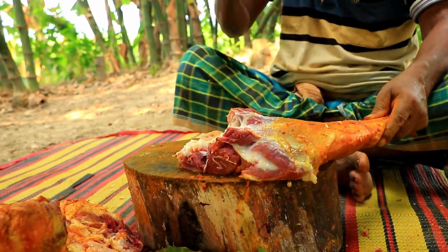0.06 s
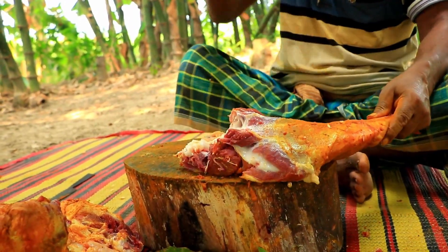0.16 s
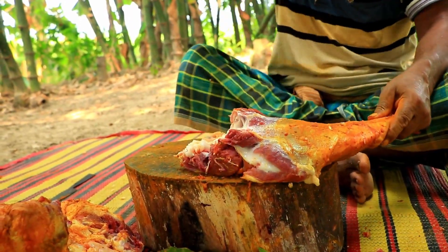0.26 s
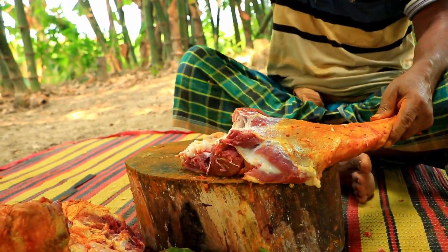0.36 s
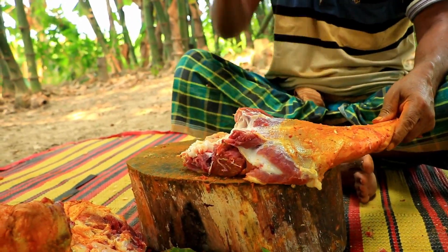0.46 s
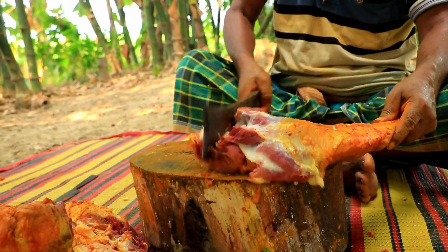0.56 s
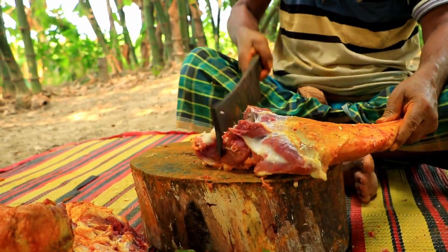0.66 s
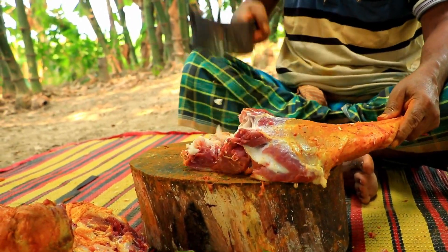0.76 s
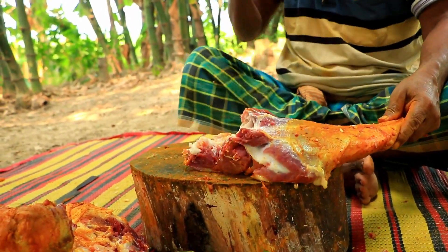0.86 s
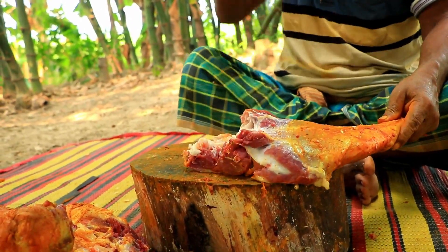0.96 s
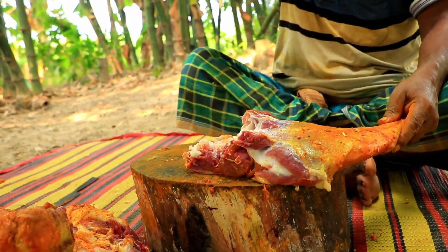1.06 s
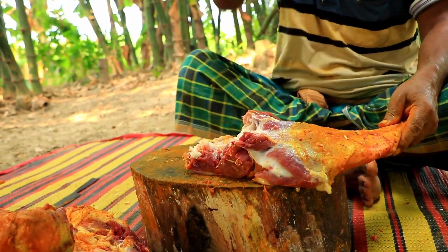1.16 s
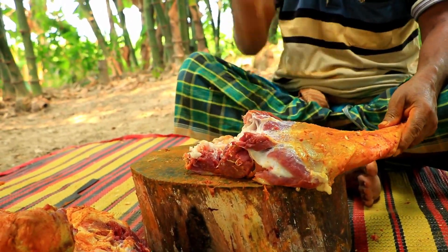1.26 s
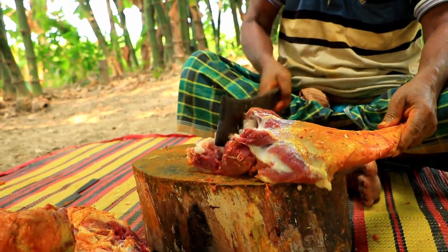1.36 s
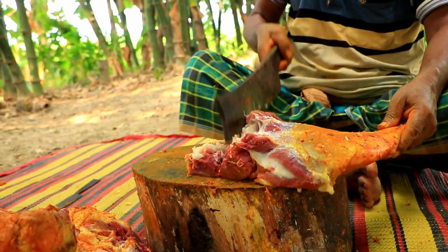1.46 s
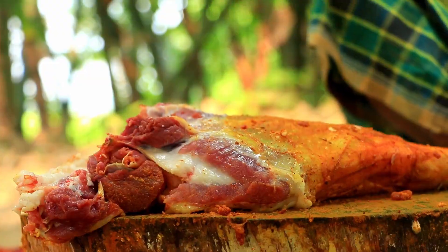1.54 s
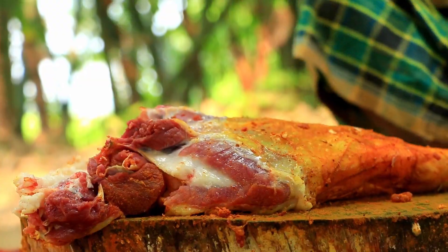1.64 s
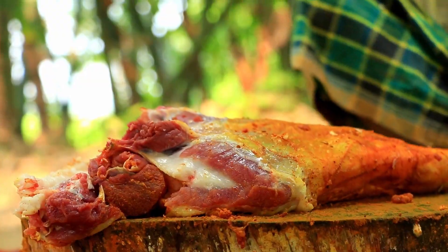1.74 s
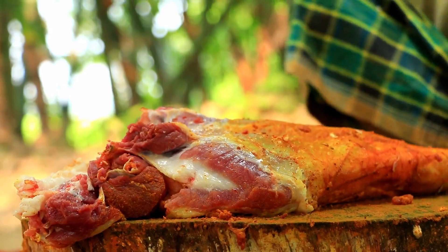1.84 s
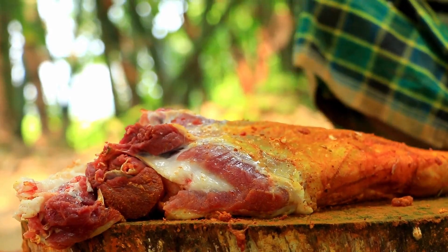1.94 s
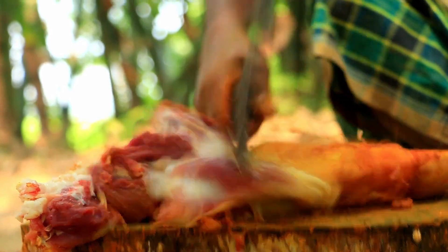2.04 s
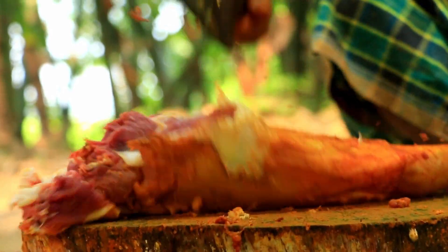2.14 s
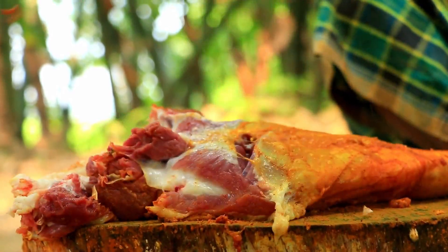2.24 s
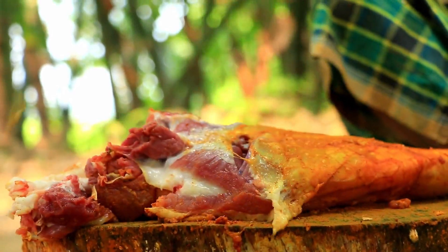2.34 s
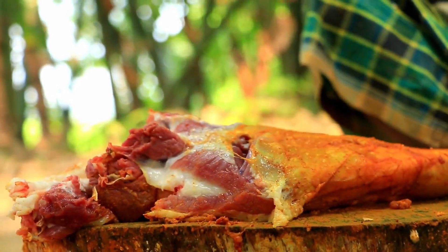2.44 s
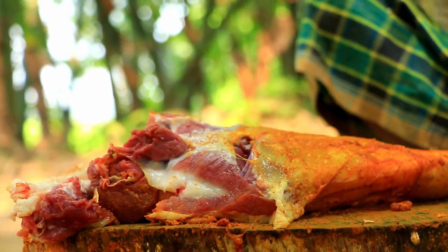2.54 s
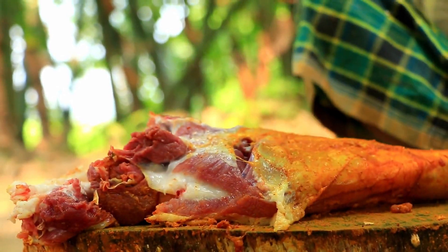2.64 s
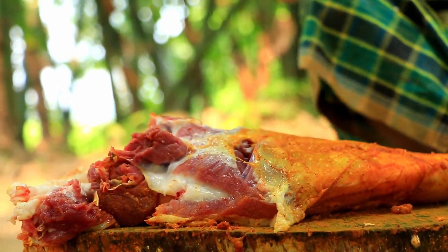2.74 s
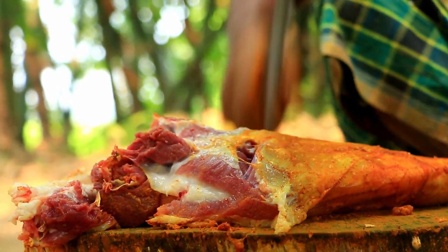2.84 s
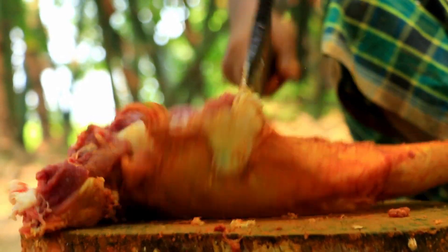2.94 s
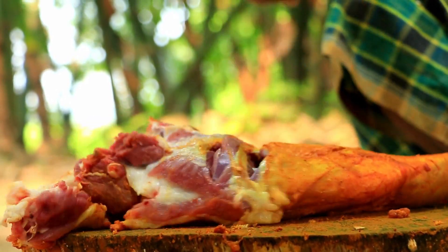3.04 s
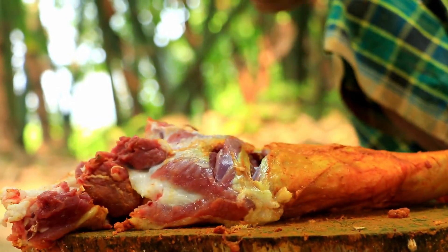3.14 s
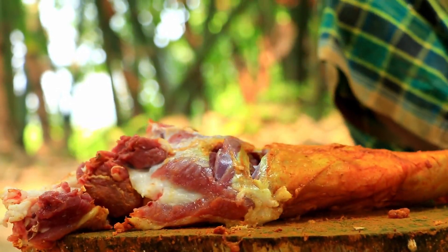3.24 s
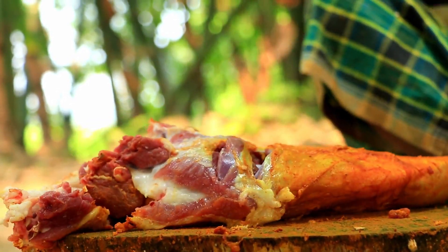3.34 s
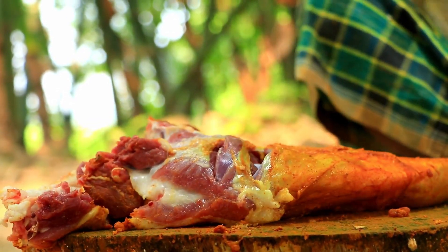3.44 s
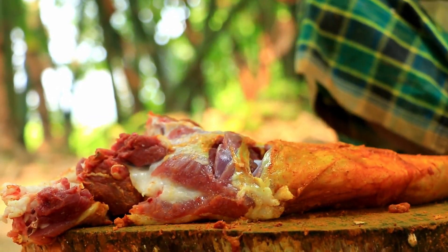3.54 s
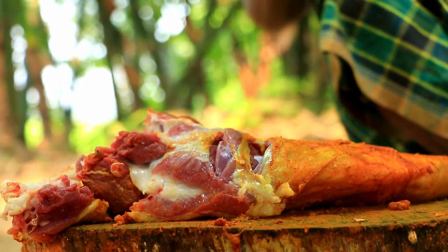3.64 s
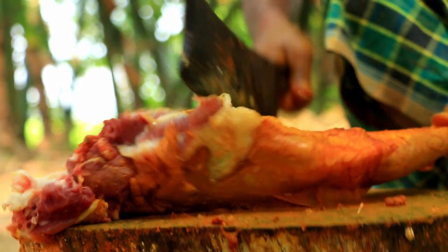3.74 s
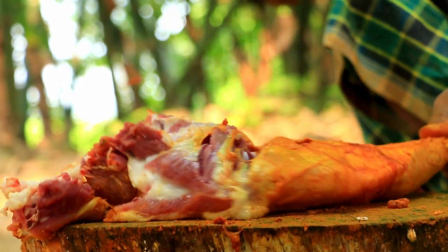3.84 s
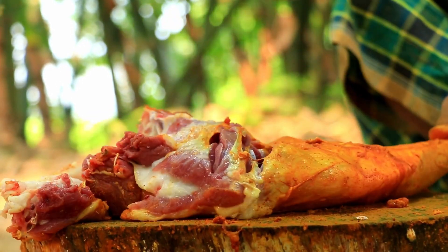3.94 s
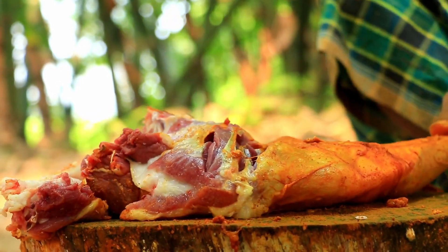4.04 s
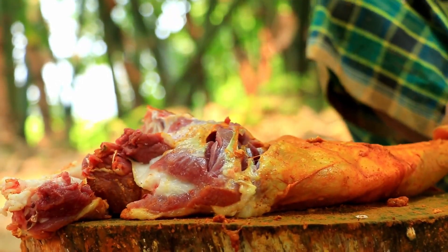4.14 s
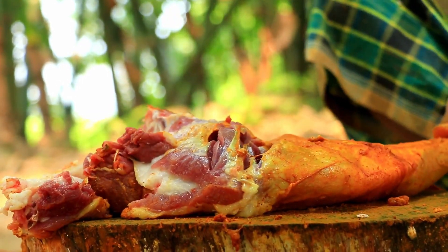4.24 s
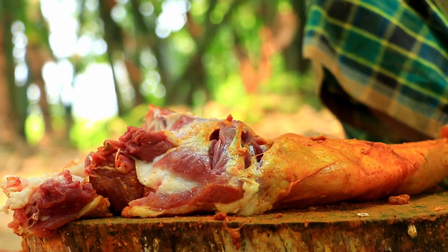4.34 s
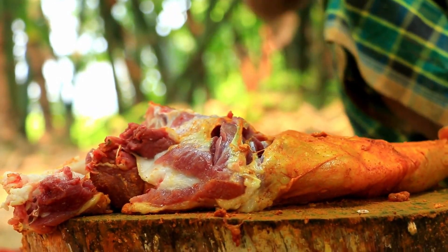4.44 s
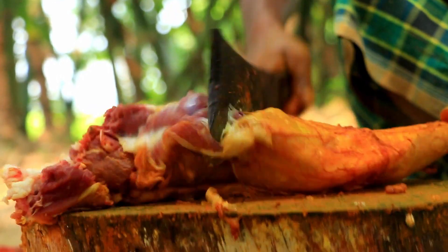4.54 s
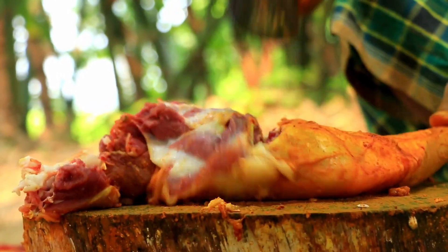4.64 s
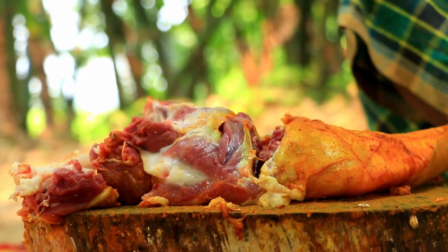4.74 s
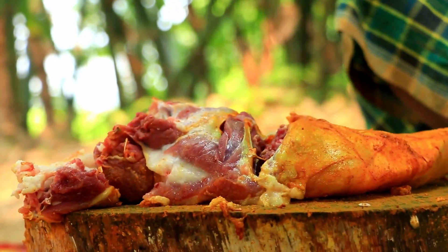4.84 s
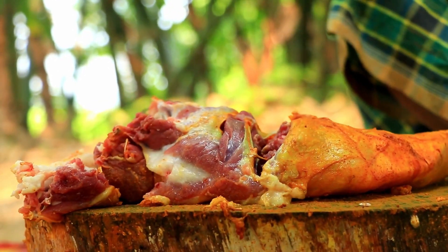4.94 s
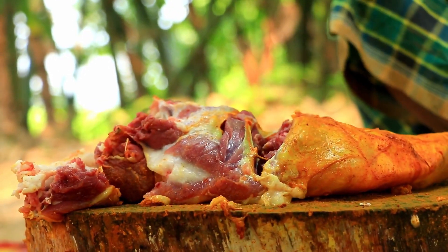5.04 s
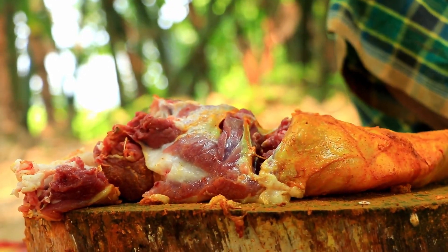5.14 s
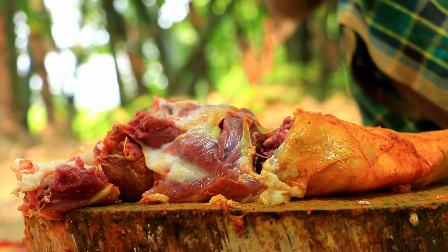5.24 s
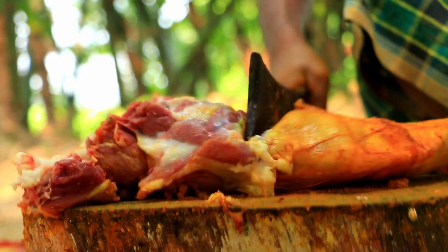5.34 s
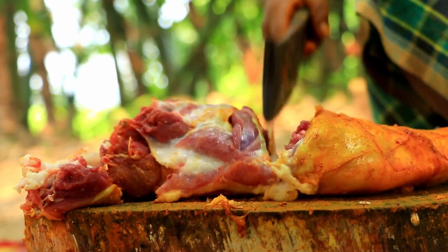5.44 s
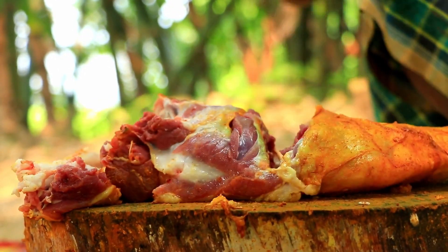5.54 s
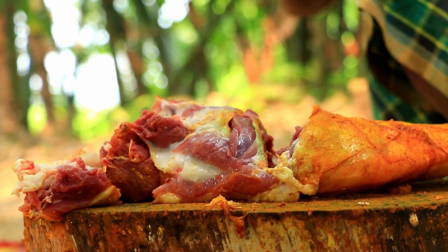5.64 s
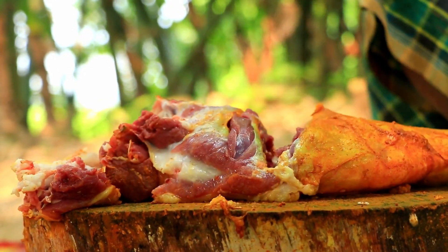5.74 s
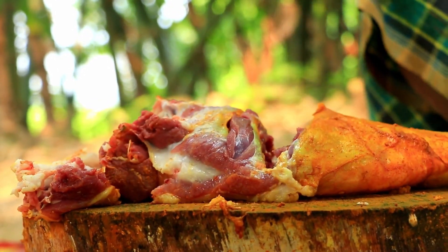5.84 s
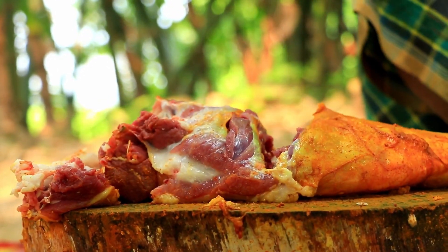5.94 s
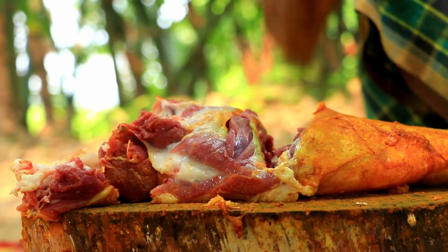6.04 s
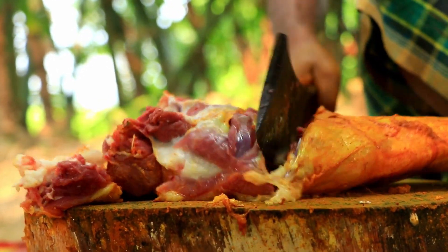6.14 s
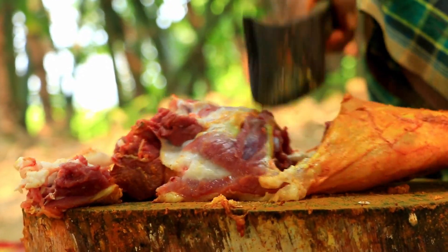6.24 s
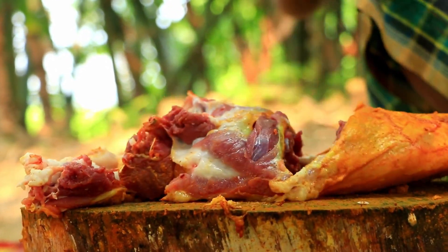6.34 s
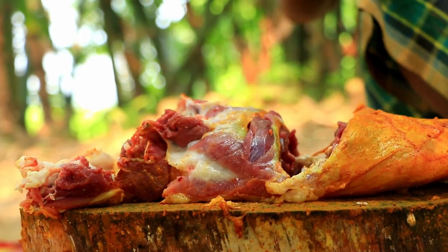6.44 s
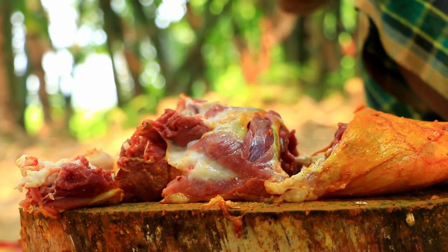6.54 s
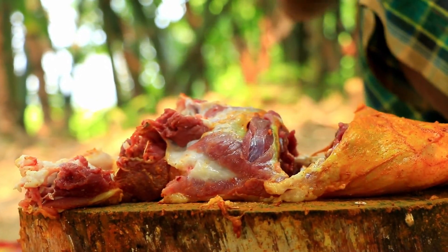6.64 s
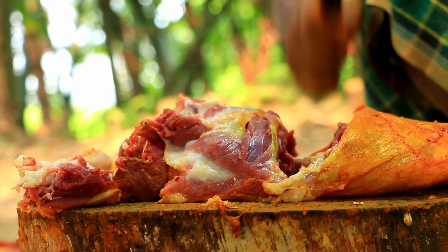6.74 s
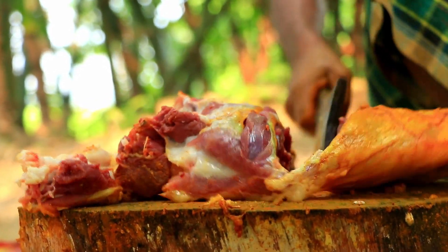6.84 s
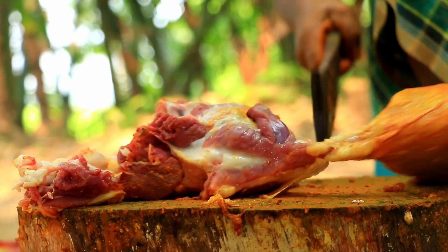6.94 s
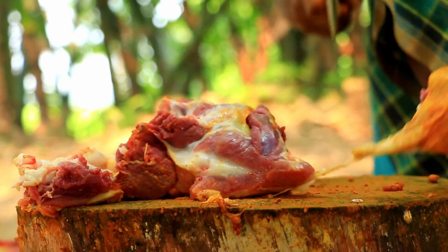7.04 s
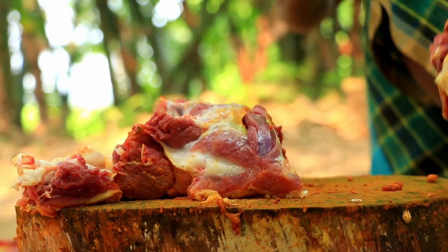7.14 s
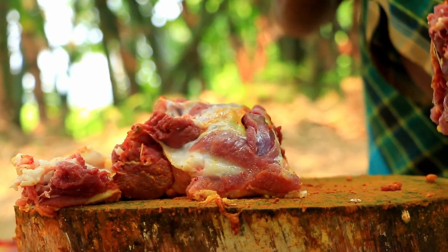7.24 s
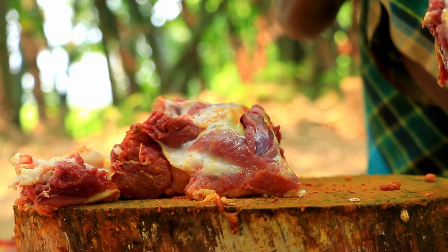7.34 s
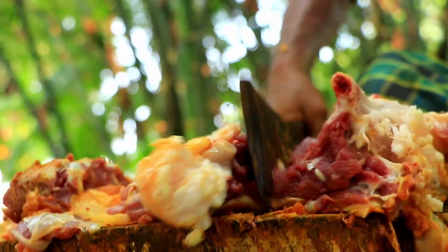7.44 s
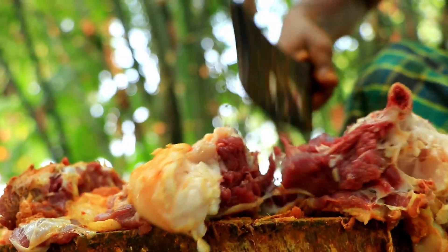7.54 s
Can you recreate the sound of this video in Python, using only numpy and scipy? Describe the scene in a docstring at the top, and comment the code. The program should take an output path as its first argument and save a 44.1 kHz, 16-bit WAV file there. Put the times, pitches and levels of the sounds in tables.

```python
"""Chopping meat in a bamboo grove

A heavy cleaver chops a leg of meat on a wooden stump, close to a stereo microphone.
Noise bursts make the crackle of flesh and bone, dying sines the thud of the stump and the ring of the blade.
The bamboo stems scatter each blow back as a dying wash of noise; the loudest blows overload the input.
Scraps tick and lumps of meat plop over the faint air of the grove and a few far tones."""
import sys
import numpy as np
from scipy import signal
from scipy.io import wavfile

SR = 44100
rng = np.random.default_rng(int(sys.argv[2]) if len(sys.argv) > 2 else 0)


def store_wav(level_fs):
    """Save 16-bit WAV to argv[1]."""
    pcm = np.round(np.clip(np.atleast_2d(level_fs), -1, 1) * 32767)
    wavfile.write(sys.argv[1], SR, pcm.T.astype(np.int16))


N = 334278   # length in samples

# How alike left and right are in the air and the scatter. Each row: pitch in Hz, likeness (0 or less = unrelated, 1 = same).
AIR_ALIKE = [(60, 0.68), (180, 0.74), (550, 0.39), (1650, -0.04), (4970, -0.01), (15000, 0.06)]
BREAK_S, GAP_S = 1.461, 0.017   # the sound breaks off here for a moment and resumes
BRIGHT_HZ = 2000   # brightness tilts the treble around this pitch


def amp(db):
    """Turns dB into a gain."""
    return 10 ** (np.asarray(db) / 20)


def at_hz(points, hz, axis=1):
    """Reads one column of a table at a pitch, on a log-frequency axis."""
    points = np.array(points)
    return np.interp(np.log(hz), np.log(points[:, 0]), points[:, axis])


def decay(t60, size):
    """Exponential fall that loses 60 dB in t60 seconds."""
    return amp(-60 * np.arange(size) / SR / t60)


def sides(pan_db):
    """Gains for left and right; a positive pan_db favours the left."""
    return amp([[pan_db / 2], [-pan_db / 2]])


def drift(rate_hz):
    """Slow random wandering with spread 1: smoothed noise, drawn at every 40th sample."""
    step = 40
    memory = np.exp(-2 * np.pi * rate_hz * step / SR)
    white = rng.standard_normal(N // step + 2002)
    slow = signal.lfilter([1], [1, -2 * memory, memory ** 2], white)[2000:]   # skip the filter's start
    return np.interp(np.arange(N) / step, np.arange(len(slow)), slow / slow.std())


def banded(white, likeness, gain):
    """Splits pairs of noises into half-octave bands, shapes each by gain(hz) and mixes them to stereo."""
    edges = 24 * 2 ** np.arange(0, 9.6, 0.5)   # Hz
    out = 0
    for k, (low, high) in enumerate(zip(edges, edges[1:])):
        band = signal.butter(2, [low, high], "band", fs=SR, output="sos")
        mid, side = signal.sosfilt(band, white[k % len(white)])
        hz = np.sqrt(low * high)
        alike = np.clip(at_hz(likeness, hz), 0, 1)
        stereo = np.sqrt(1 + alike) * mid + np.sqrt(1 - alike) * side * [[1], [-1]]
        out = out + gain(hz) * stereo
    return out


def add(out, sound, s):
    """Mixes a stereo sound in at time s."""
    i = round(s * SR)
    out[:, i:i + sound.shape[1]] += sound[:, :N - i]


def air(patchy_db=1.0):
    """Leaves, far rumble and input hiss: one coloured noise whose low bands waver more than its high ones."""
    # Colour of the air. Each row: pitch in Hz, relative level in dB.
    colour = [(13, -43), (22, -34), (53, -4.5), (106, -4), (164, -9.5), (335, -12.5), (396, -12),
              (442, -15.5), (480, -12.5), (1010, -19.5), (2370, -22.5), (7940, -28), (15800, -41.5)]
    # Loudness of the air before balance and gap. Each row: time in seconds, level in dB.
    loudness = [(0.0, -58.5), (0.36, -61.5), (0.69, -58), (0.99, -60.5), (1.88, -59.5), (2.4, -57),
                (5.07, -59), (6.33, -58.5), (6.88, -59.5), (7.58, -58.5)]
    together = drift(0.5)   # wavering shared by all bands

    def gain(hz):
        wavering = 0.6 * together + drift(6)
        return amp(at_hz(colour, hz) + patchy_db * (300 / hz) ** 0.46 * wavering)

    noise = banded(rng.standard_normal((2, 2, N)), AIR_ALIKE, gain)
    t = np.arange(N) / SR
    s, level_db = np.transpose(loudness)
    level = amp(np.interp(t, s, level_db))
    # nearly silent during the gap, a little softer after it
    gap_times = BREAK_S + np.array([0, 0.004, GAP_S, GAP_S + 0.004])
    gap = np.interp(t, gap_times, [1, 0.027, 0.034, 0.85])
    return noise / noise.std() * level * gap * sides(2.5)


def tones():
    """Faint gliding sines from far off, wavering in pitch and level."""
    # Each row: start in seconds, end in seconds, first pitch in Hz, last pitch in Hz, mean level in dB.
    glides = [(-.04, .15, 710, 680, -63), (1.48, 1.95, 410, 405, -68), (1.87, 1.93, 2600, 2700, -72),
              (4.2, 4.38, 310, 280, -65), (4.84, 4.97, 500, 490, -66), (5.9, 6.13, 300, 290, -63),
              (6.4, 6.62, 700, 560, -66), (6.42, 6.56, 350, 315, -62), (6.55, 6.7, 290, 270, -66)]
    out = np.zeros((2, N))
    for start, end, from_hz, to_hz, level_db in glides:
        size = round((end - start) * SR)
        hz = np.linspace(from_hz, to_hz, size) * (1 + 0.01 * drift(8)[:size])
        level = amp(level_db + 2.5 * drift(12)[:size])
        glide = np.sin(2 * np.pi * np.cumsum(hz) / SR) * np.sqrt(np.hanning(size)) * level
        heard = glide[max(round(-start * SR), 0):]   # a negative start loses its beginning
        add(out, heard * np.ones((2, 1)), max(start, 0))
    return out


def lumps(size=SR // 5):
    """Soft lumps of meat settle with a dull plop: a low ring and its overtone, both dying quickly."""
    # Each row: start in seconds, level in dB, pitch in Hz.
    plops = [(0.075, -52, 285), (0.329, -50.5, 229), (0.666, -38, 410), (0.855, -47.5, 473),
             (3.006, -36.5, 201), (3.45, -47, 121.3), (4.623, -36.5, 153), (5.42, -34, 236),
             (5.614, -44.5, 501), (6.31, -42.5, 166), (6.411, -41, 327), (6.923, -34.5, 250)]
    out, t = np.zeros((2, N)), np.arange(size) / SR
    envelope = decay(0.047, size) * (1 - np.exp(-t / 0.00073))   # quick onset, then the fall
    for s, level_db, hz in plops:
        plop = np.sin(2 * np.pi * hz * t) + 0.32 * np.sin(2 * np.pi * 1.73 * hz * t)
        add(out, amp(level_db) * plop * envelope * np.ones((2, 1)), s)
    return out


def crumbs(count=14, mean_db=-68):
    """Faint crumbs fall at random moments, pitches and sides; rows are like those of the scraps."""
    low = [0, mean_db - 4, 1000, -25, -5]
    high = [N / SR, mean_db + 4, 4500, -5, 7]
    return list(rng.uniform(low, high, (count, 5)))


def ticks(size=SR // 10):
    """Scraps and splinters land: a short noise burst through a broad resonance plus a bright edge."""
    # Each row: start in seconds, level in dB, pitch in Hz, bright edge in dB, left over right in dB.
    scraps = [(0.0548, -66, 5660, -13, -1), (0.1163, -54.5, 4900, -2, -2), (0.6233, -26.5, 1400, -14, 1),
              (0.7449, -49.5, 3160, -6, 4), (0.9143, -54, 2170, -26.5, 2.5), (2.2608, -63, 6870, 8, -5),
              (2.2842, -44, 1770, -15, 0), (2.308, -50, 1010, -9, 10), (2.3154, -43, 2140, -20, -2),
              (2.381, -70, 10000, -5, -5), (2.397, -59, 2000, -20, 2.5), (2.4123, -39.5, 1440, -2.5, 1),
              (2.4573, -54, 1480, -24.5, -1), (2.4787, -58.5, 1450, -13, 2), (2.515, -57, 1300, -18, 11),
              (2.5378, -59, 2590, -17, 3), (2.5829, -44, 2140, -35, 3.5), (2.6334, -54, 1510, 0.5, 5),
              (2.646, -50, 1700, -4, 2), (2.6543, -48, 2780, 11.5, 8), (2.7028, -54, 1870, -21, 6),
              (2.7164, -56, 1390, -16, 6), (2.8275, -51, 1850, -24, 4), (3.008, -46, 2000, -14, 4),
              (3.05, -55, 1770, -11, 0), (3.1148, -61, 2650, -5, .1), (3.1246, -59, 3600, -14, 7),
              (3.1972, -61, 3000, 5, 2), (3.2056, -52, 3500, 7, -5), (3.2485, -57, 2770, -22, -1),
              (3.2984, -63, 1980, 14.5, -1), (3.3448, -49.5, 1370, -24, 6.5), (3.4186, -52.5, 2330, -33, 7),
              (3.443, -52, 1770, -20, 6), (3.911, -53.5, 1870, -24, 9), (3.938, -56, 1100, -20, 2),
              (3.9585, -58, 2070, -15, 3), (4.0153, -55, 1864, -21, 5), (4.7346, -54.5, 2640, -6, 2),
              (4.787, -53.5, 1700, 2, 1), (5.7315, -50, 1660, -19, -4), (5.8336, -57.5, 1042, -19, 0),
              (5.887, -64, 2800, -15, .1), (5.929, -66, 3000, -8, -2), (6.88, -42, 2210, 9, -1),
              (7.1137, -53, 1540, -13, 3), (7.1338, -57.5, 1030, -18, 10), (7.1731, -52.5, 1830, -26, 8),
              (7.1937, -51.5, 1550, -23, 8), (7.2714, -55.5, 1820, -18, 11),
              (7.3142, -54.5, 1510, -19.5, 7), (7.3668, -52, 1790, -26.5, 7), (7.436, -63, 1000, 0, -1)]
    resonance_db = 19
    out = np.zeros((2, N))
    envelope = decay(0.022, size) * (1 - decay(0.005, size))
    edge_band = signal.butter(2, [4500, 13000], "band", fs=SR, output="sos")
    for s, level_db, hz, bright_db, pan_db in scraps + crumbs():
        burst = rng.standard_normal((2, size)) * envelope
        burst[1] = 0.43 * burst[0] + 0.9 * burst[1]   # right partly follows left
        body_band = signal.butter(2, [hz / 2.02, hz * 1.52], "band", fs=SR, output="sos")
        body = signal.sosfilt(body_band, burst)
        edge = signal.sosfilt(edge_band, burst)
        tick = amp(resonance_db) * body + amp(bright_db) * edge
        add(out, amp(level_db) * tick * sides(pan_db), s)
    return out


def colour_db(hz, thump_hz, thump_db, knock_hz, knock_db, bright_db):
    """A blow's colour: more or less thump, a knock where the edge meets bone or wood, a tilted treble."""
    # A plain blow. Each row: pitch in Hz, level in dB.
    plain = [(100, -29), (200, -23), (340, -20), (600, -23), (1050, -16.5), (2050, -10), (4200, -15.5),
             (7700, -19.5), (12500, -32.5)]
    thump_octaves, knock_octaves = 0.6, 0.66   # widths of the two humps
    thump = thump_db * np.exp(-(np.log2(hz / thump_hz) / thump_octaves) ** 2)
    knock = knock_db * np.exp(-(np.log2(hz / knock_hz) / knock_octaves) ** 2)
    tilt = bright_db * max(np.log2(hz / BRIGHT_HZ), 0)
    return at_hz(plain, hz) + thump + knock + tilt


def stems(patchy_db=1.5, size=SR // 2, count=130):
    """Single stems echo unevenly, so each band of the scatter comes in lumps."""
    points = rng.standard_normal(count)
    return amp(patchy_db * np.interp(np.arange(size), np.linspace(0, size, count), points))


def scatter(after, colour, scatter_db, reach):
    """The stems send the blow back as a wash of noise that swells after the cut and dies away."""
    # Answer of the grove. Each row: pitch in Hz, level in dB, t60 in seconds before each blow's own share.
    grove = [(60, -12.5, 0.38), (250, -5, 0.3), (990, -4.5, 0.22), (3000, -6.5, 0.28), (6340, -1.5, 0.27),
             (10400, -1, 0.48), (15000, -2.5, 0.3)]
    drive_db = 52
    # near stems answer first and loudest
    arriving = (1 - np.exp(-after / 0.031)) * (1 + 2.2 * np.exp(-after / 0.035))

    def gain(hz):
        level = amp(scatter_db + drive_db + colour_db(hz, *colour) + at_hz(grove, hz)) / np.sqrt(hz)
        dying = amp(-60 * after / (reach * at_hz(grove, hz, axis=2)))
        return level * arriving * dying * stems()

    return banded(rng.standard_normal((2, 2, len(after))), AIR_ALIKE, gain)


def blade(struck, bright_db, ring_db, lead_hz, lead_db, second_hz, second_db):
    """The steel rings in many modes of chance level; the spot that lands makes two of them lead."""
    # Each row: pitch in Hz, relative level in dB, t60 in seconds.
    modes = [(872, -20, .14), (1542, -9, .09), (1765, -4, .13), (2880, -1, .07), (3750, -5, .1),
             (5575, -7, .13), (6550, -5, .08), (7495, -4, .11), (10320, -7, .08)]
    follows, spread_db = 1.5, 3   # bright blows favour the high modes; chance per mode
    hz, db, t60 = np.array(modes).T[:, :, None]
    tilt = follows * bright_db * np.log2(hz / BRIGHT_HZ)
    db = db + ring_db + tilt + spread_db * rng.standard_normal(hz.shape)
    db[hz == lead_hz], db[hz == second_hz] = lead_db, second_db
    return np.sum(np.sin(2 * np.pi * hz * struck) * amp(db - 60 * struck / t60), axis=0)


def stump(struck, colour):
    """The wood thuds as a set of sines; the meat on top shortens their fall."""
    # Each row: pitch in Hz, relative level in dB, t60 in seconds without meat.
    modes = [(32.2, -4, 0.083), (59, -19.5, 0.44), (109.5, 1.5, 0.076), (185, 6, 0.045), (298, 7, 0.025),
             (403, -0.5, 0.036), (569, 0.16, 0.025), (937, -4.5, 0.023)]
    damping = 0.8   # share of the t60 left under the meat
    thud = 0
    for k, (hz, db, t60) in enumerate(modes):
        level = amp(colour_db(hz, *colour) + db + 4.5) * (-1) ** k   # neighbours swing in opposition
        thud = thud + level * np.sin(2 * np.pi * hz * struck) * amp(-60 * struck / (t60 * damping))
    landed = 1 - np.exp(-struck / 0.0002)   # the contact builds within a millisecond
    return landed * thud


def crackle(t, cut_ms, colour, splatter_db, reach):
    """Fibres snap unevenly: noise swells while the edge cuts, then falls fast with a slower splatter."""
    # How alike left and right are. Each row: pitch in Hz, likeness (0 = unrelated, 1 = same).
    alike = [(100, 1), (600, 0.5), (1500, 0.41), (4000, 0.1), (12000, 0.6)]
    drive_db = 39.5
    cut = cut_ms / 1000
    after = np.maximum(t - cut, 0)
    crack_t60 = 0.05 - 0.006 * cut_ms   # a longer cut leaves a shorter crack
    swell = amp(-30 * np.maximum(1 - t / cut, 0)) * np.minimum(t / cut * 3, 1)
    splatter = amp(splatter_db) * amp(-60 * after / (0.065 * reach))
    fall = amp(-60 * after / crack_t60) + splatter
    fibres = rng.standard_normal((2, 2, len(t))) * amp(1.9 * rng.standard_normal(len(t)))

    def gain(hz):
        thin_lows = min(1, hz / 900) ** 0.5
        return amp(colour_db(hz, *colour) + drive_db) / np.sqrt(hz) * thin_lows

    return banded(fibres * swell * fall, alike, gain)


def blow(row, size=SR // 2):
    """One chop: the edge crackles through, the stump and blade are struck, and the stems answer."""
    _, level_db, *colour, cut_ms, lag_ms, splatter_db, scatter_db, reach, pan_db = row[:13]
    t, cut = np.arange(size) / SR, cut_ms / 1000
    after = np.maximum(t - cut, 0)   # seconds since the cut
    struck = np.maximum(t - cut - lag_ms / 1000, 0)   # seconds since the stump was hit
    crack = crackle(t, cut_ms, colour, splatter_db, reach)
    thud = stump(struck, colour)
    ring = blade(struck, colour[-1], *row[13:])
    wash = scatter(after, colour, scatter_db, reach)
    return (amp(level_db) * (crack + thud + wash) + ring) * sides(pan_db)


def chopping():
    """Every blow starts one cut time early, so that its cut ends on time."""
    # Each row: time in seconds, level in dB (not of the ring), thump pitch in Hz, thump in dB,
    # knock pitch in Hz, knock in dB, brightness in dB per octave, cut time in ms, thud lag in ms,
    # splatter in dB, scatter in dB, factor on splatter and scatter t60, left over right in dB,
    # blade ring in dB, leading blade mode in Hz, its level in dB, second leading mode in Hz, its level in dB.
    blows = [(0.602, 3, 210, 6, 520, 13, -.5, 4.16, 1.24, -16, -32, 1, 2.1, -52, 7495, -45, 2880, -45),
             (1.385, 6, 190, 6, 600, 15, -2, 6.3, -0.58, -15, -34.5, 1.01, 2.1, -50, 1765, -32, 872, -40),
             (2.105, 10, 180, -7, 650, -6, 1.5, 6.05, -1.2, -17, -39.5, 1.75, 3.8, -40, 3750, -31, 5575, -33),
             (2.918, 0.5, 140, 13, 1000, -8, .1, 4.2, -0.95, -16, -31, 1.15, 3, -29, 3750, -27, 1765, -30),
             (3.7476, 6, 100, 4, 850, -6, .1, 4.33, -0.9, -16, -36, 1.38, 2.5, -43, 7495, -38, 1765, -42),
             (4.552, 5.5, 300, -4, 600, 5, 1, 5.5, -1.9, -16, -36.5, 1.4, 1.6, -36, 7495, -28, 2880, -31),
             (5.358, 5, 220, 7, 550, 12, -2.5, 2.9, 2.1, -14, -34, 1.24, 3.5, -36, 2880, -19, 1765, -31),
             (6.158, 5.5, 115, -16, 420, 12, -2.5, 3.13, -0.1, -16, -35, 1.33, 1.7, -30, 2880, -16, 1765, -25),
             (6.86, 6, 195, -15, 650, 8, -3.5, 3.64, -0.47, -17, -36.5, 1.24, 4, -33, 1542, -17, 5575, -35),
             (7.466, -36, 120, 9, 700, 19, .4, 0.51, -0.4, -14, -14.5, 1.9, -0.5, -60, 872, -31, 1542, -38)]
    out = np.zeros((2, N))
    for row in blows:
        start, sound = row[0] - row[7] / 1000, blow(row)
        if 0 < BREAK_S - start < 1 / 4:
            sound[:, round((BREAK_S - start) * SR):] = 0   # its tail breaks off
        add(out, sound, start)
    return out


def scene():
    """All sources at the microphone."""
    return air() + tones() + lumps() + ticks() + chopping()


def record(dry):
    """The input overloads smoothly near full scale, then a steep filter cuts the top."""
    hard = dry / (1 + np.abs(dry) ** 8) ** (1 / 8)
    top_cut = signal.cheby2(20, 70, 16138.5, fs=SR, output="sos")   # 70 dB down from this Hz upward
    return signal.sosfilt(top_cut, hard)


dry = scene()
out = record(dry)
store_wav(out)
```